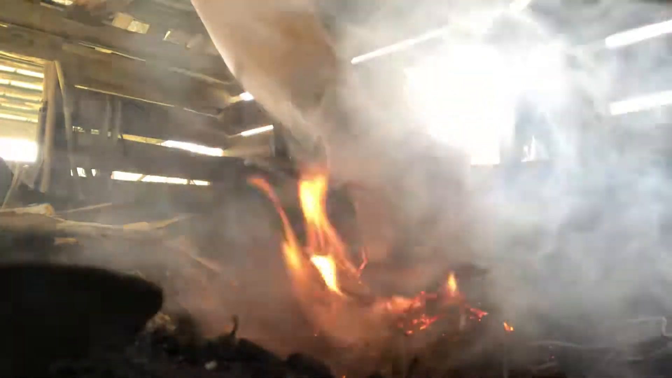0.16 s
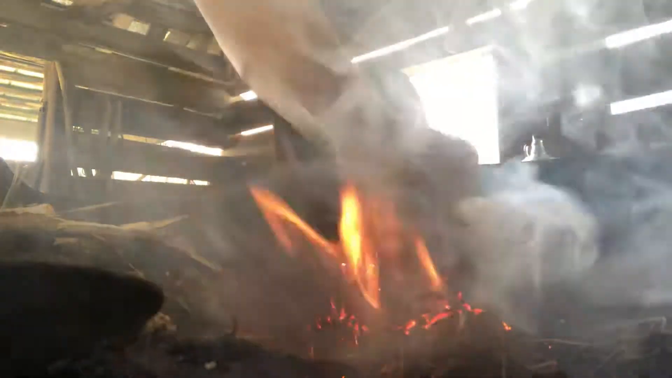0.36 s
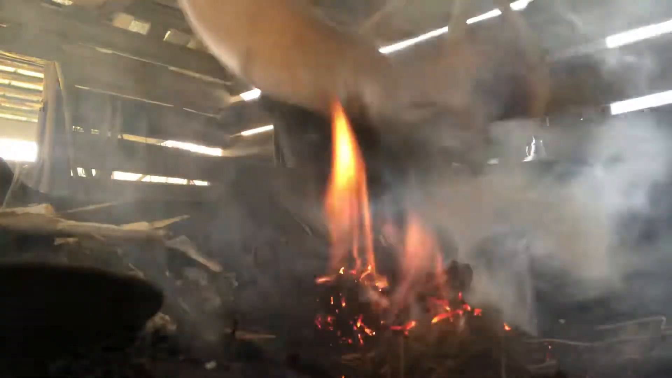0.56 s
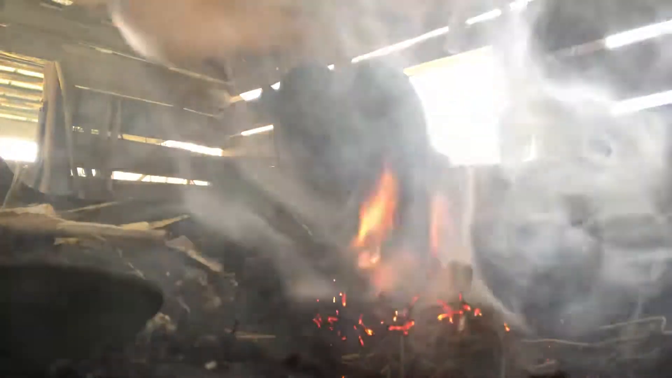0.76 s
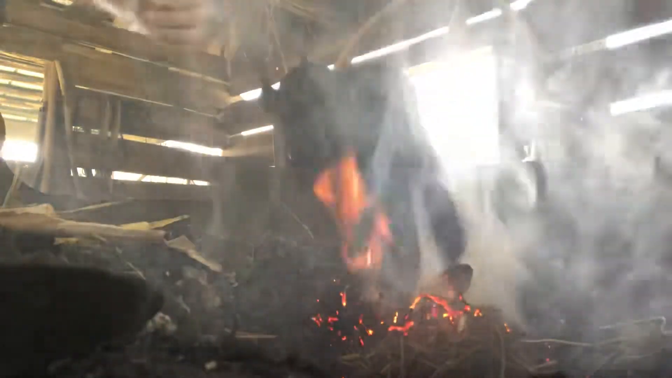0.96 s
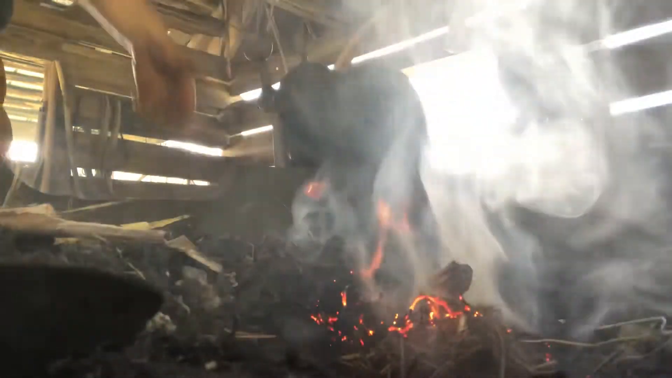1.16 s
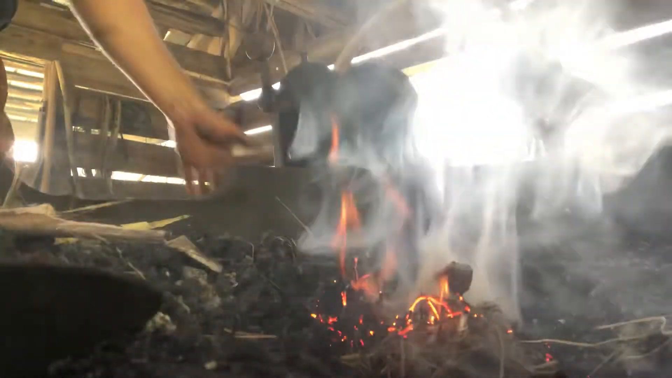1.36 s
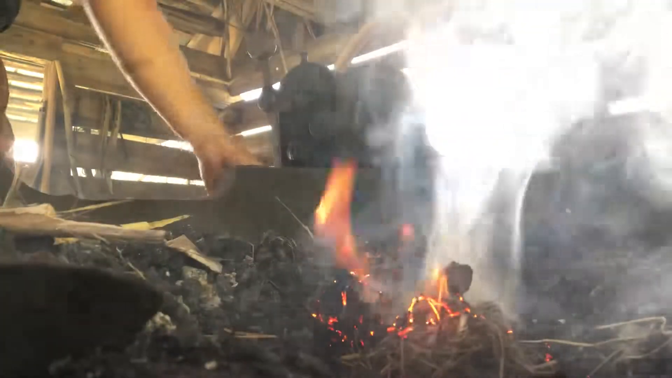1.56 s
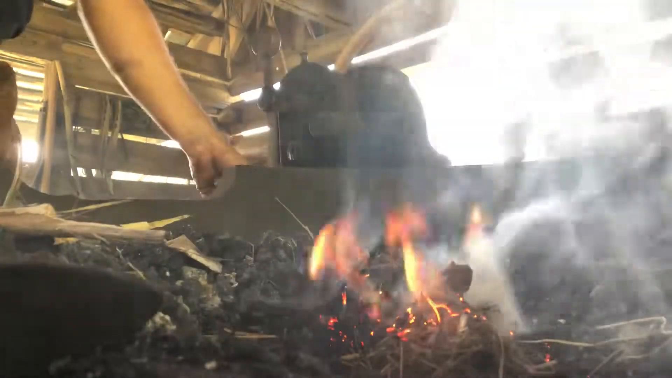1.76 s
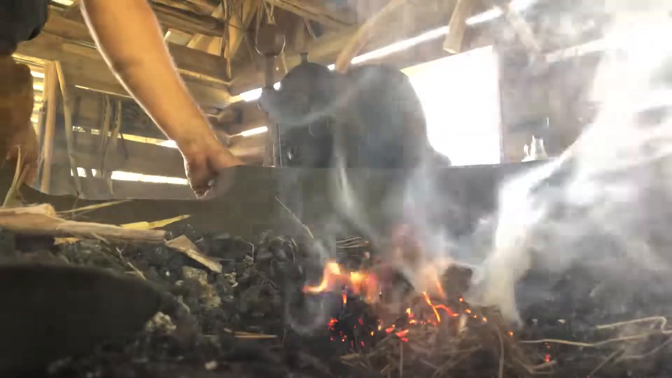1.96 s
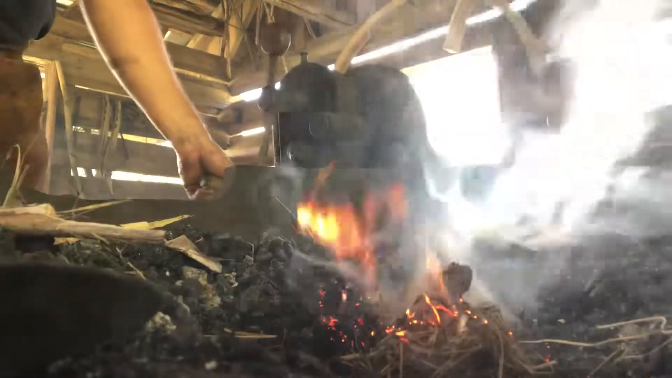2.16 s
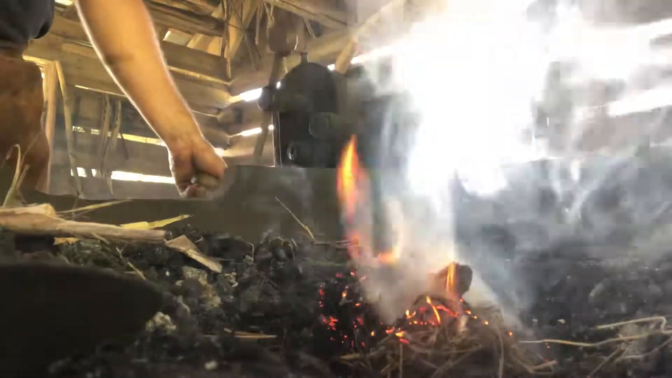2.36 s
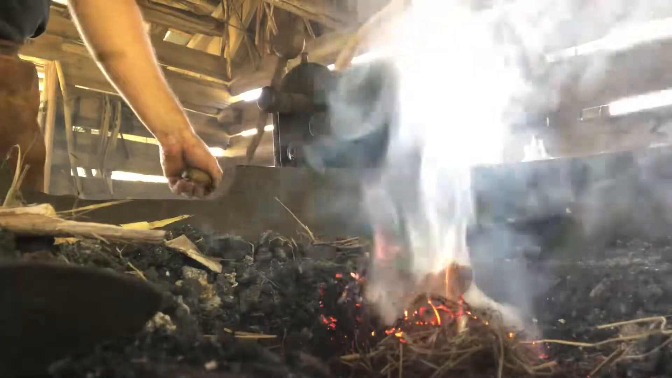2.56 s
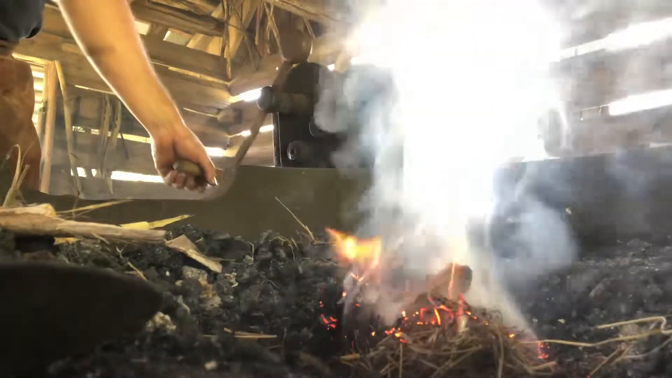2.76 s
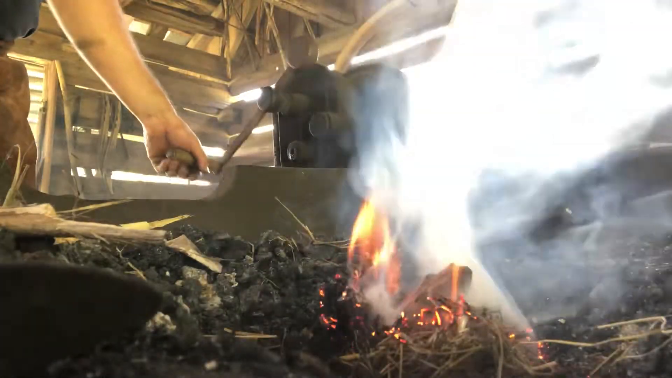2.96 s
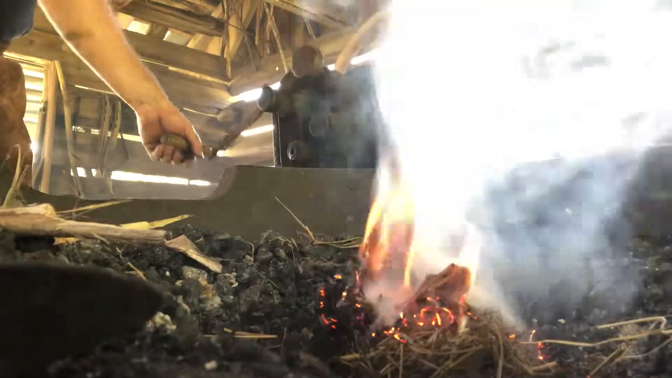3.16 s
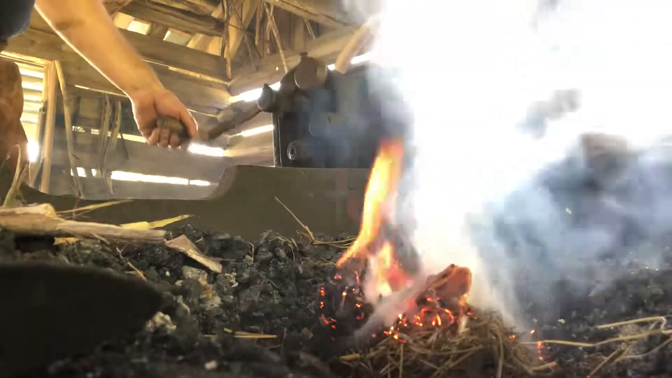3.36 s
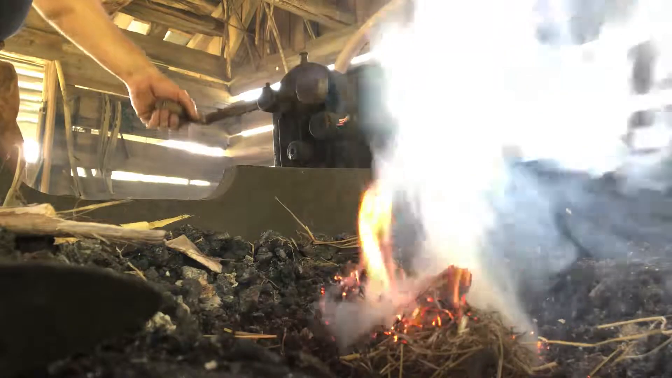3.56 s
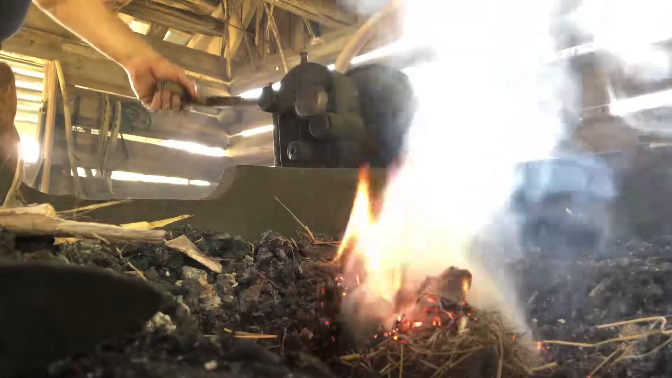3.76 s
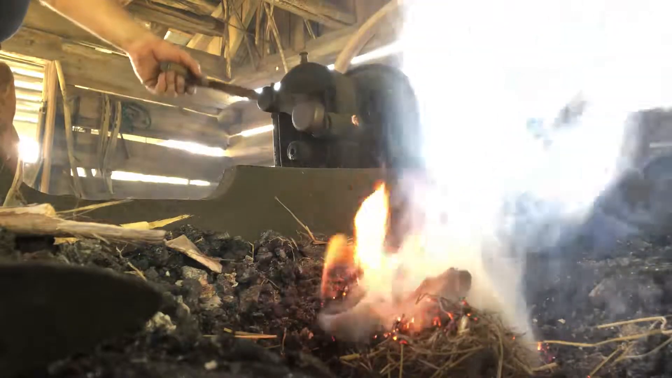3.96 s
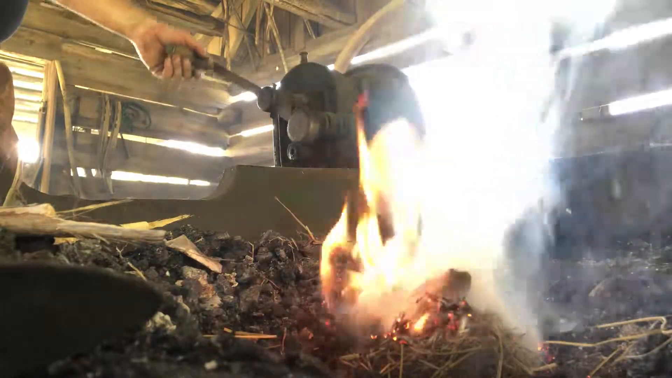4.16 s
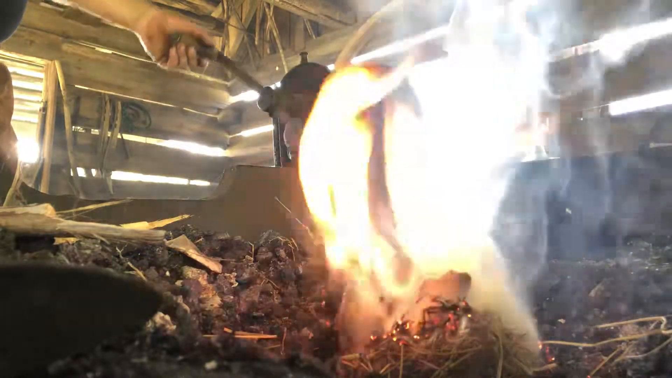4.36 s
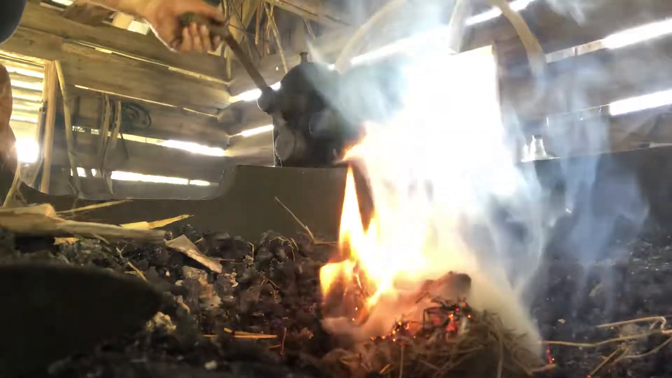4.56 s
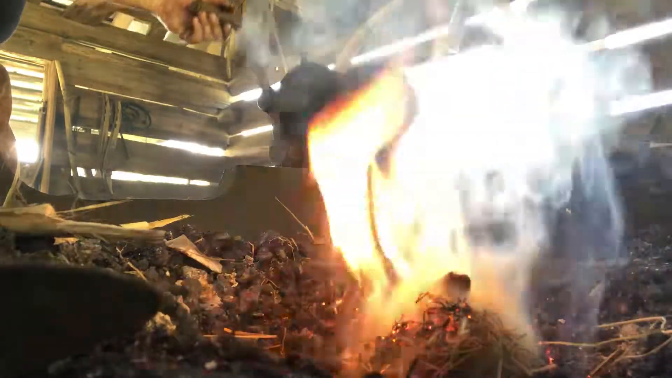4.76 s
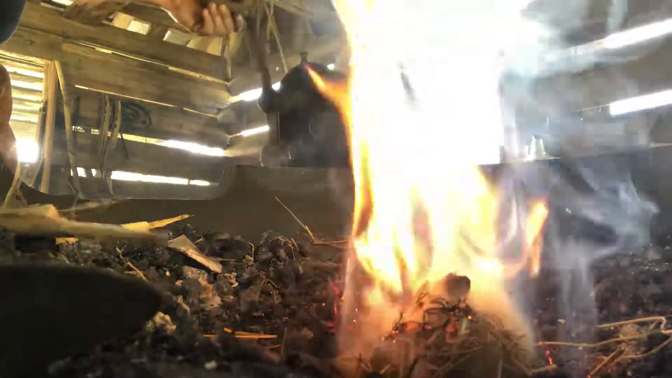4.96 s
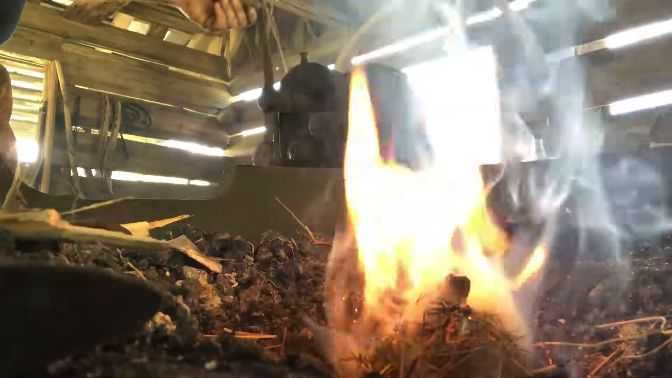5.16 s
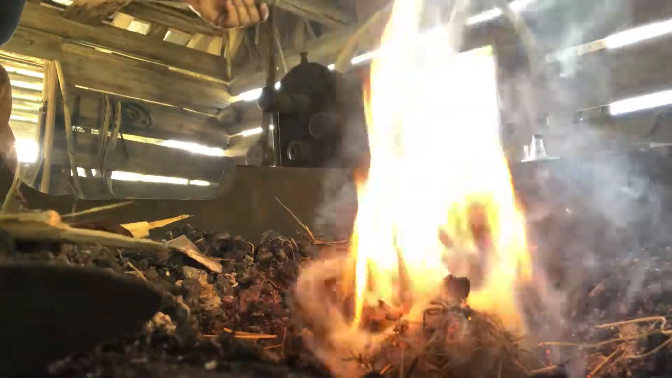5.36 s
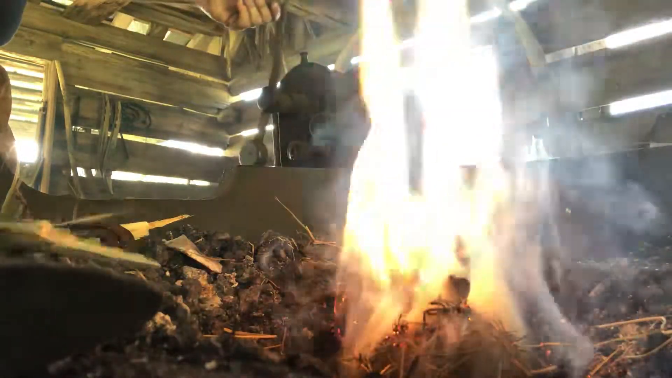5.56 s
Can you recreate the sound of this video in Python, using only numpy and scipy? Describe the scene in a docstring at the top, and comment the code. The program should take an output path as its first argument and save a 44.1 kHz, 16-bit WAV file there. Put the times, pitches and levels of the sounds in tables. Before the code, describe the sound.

From the edge of a hearth in a slatted shed, a geared hand blower is heard close up over faint hiss and soft low air flutter. For the first second and a half the fan coasts with a low drone and airy whirr, its gear noise fading. At about 1.6 seconds the loose grip clicks and the blower shudders; around 1.7 a tight cluster of heavy iron knocks rings briefly with clatter. The crank arm clanks at 2.0, followed by a short gear groan. Cranking then builds into a steady, uneven whir by about 2.8, with throbbing drone, wavering whines and a raspy, singing edge of metal teeth. Soft gusts come near 4 seconds, and lesser knocks at 4.4 and 4.6. From about 4.7 fine straw crackle grows, with distinct dry snaps from 4.9 until the end at roughly 5.6, the whir still running.

```python
"""Hand-cranked forge blower

A geared blower feeds a small fire of straw and coals in a slatted shed.
The fan coasts with a low drone, a hand grabs the crank, the slack gears knock, the teeth whir.
Noise through resonances makes fan and gears, dying sines and noise the blows, noise bursts the fire.
Late on, the straw crackles ever louder."""
import sys
import numpy as np
from scipy import signal
from scipy.fft import rfft, irfft, next_fast_len
from scipy.io import wavfile
from scipy.ndimage import uniform_filter1d

SR = 44100
rng = np.random.default_rng(int(sys.argv[2]) if len(sys.argv) > 2 else 0)


def inscribe(sig):
    """Save sig as 16-bit PCM at rate SR to the path in sys.argv[1].

    A 1-D sig is mono; a 2-D sig holds one channel per row.
    Samples are clipped to [-1, 1] before scaling.
    """
    pcm = np.round(np.clip(np.atleast_2d(sig).T, -1, 1) * 32767)
    wavfile.write(sys.argv[1], SR, pcm.astype(np.int16))


N = 247489
TIME = np.arange(N) / SR  # s
PADDED = next_fast_len(N)
BINS = np.fft.rfftfreq(PADDED, 1 / SR)  # Hz
CUT_HZ = 15700

# Faint shed hiss, relative spectrum: (frequency [Hz], density [dB per Hz])
HISS_SPECTRUM = [(1470, -48), (2500, -7), (2760, -1.5), (2980, 0), (3100, 1), (4600, 0), (5750, -0.5),
                 (8420, -5.5), (15500, -12)]
# Low flutter of the blast, relative spectrum: (frequency [Hz], density [dB per Hz])
BUFFET_SPECTRUM = [(15, -48), (28, -37), (42, -17.5), (62, -3), (90, -4), (115, -0.5), (160, -4.5),
                   (300, -5.5), (700, -52), (2000, -91)]
# Blast through the coals, relative spectrum: (frequency [Hz], density [dB per Hz])
RUSH_SPECTRUM = [(100, -21.5), (450, 2.5), (900, -1), (1500, -9), (1900, -18), (2400, -11), (5000, -42)]
# Deep flutter of a gust, relative spectrum: (frequency [Hz], density [dB per Hz])
GUST_SPECTRUM = [(15, -42), (28, -14), (46, -6), (70, 0.5), (110, -4.5), (170, 2), (380, -1), (800, -23.5),
                 (2000, -41)]
# Airy whirr of the freewheeling fan, relative spectrum: (frequency [Hz], density [dB per Hz])
COAST_SPECTRUM = [(200, -15), (450, 11), (800, -5), (1150, -6.5), (1600, 2), (2000, -14), (3000, -22)]
# Gusts of air and flame: (time [s], hold [s], level before the lowpass [dB], highest frequency [Hz])
GUSTS = [(1.61, 0.15, -43.5, 900), (1.744, 0.13, -44.5, 900), (1.863, 0.028, -39, 75),
         (3.97, 0.44, -55.5, 900), (4.393, 0.273, -52.5, 700), (5.147, 0.06, -53, 110)]
# Snaps of straw and kindling:
# (time [s], peak [dB], ring frequency [Hz], t60 [s], bright tick relative to ring [dB])
SNAPS = [(4.917, -50.5, 4150, 0.073, 3.5), (4.936, -50, 3800, 0.07, -3), (4.955, -45, 4030, 0.028, -6),
         (4.999, -55.5, 3730, 0.15, -13), (5.075, -53, 3600, 0.13, -18), (5.094, -52, 3720, 0.037, -15),
         (5.136, -63, 4000, 0.028, -16), (5.307, -48.5, 3400, 0.1, -4), (5.355, -49, 3700, 0.1, 0),
         (5.381, -53, 3480, 0.042, -4), (5.573, -54.5, 3720, 0.19, -15), (5.595, -49, 3370, 0.11, -5.5)]

# Fan housing resonances: (frequency [Hz], width [Hz], gain [dB], extra gain per unit of lean [dB])
HOUSING_MODES = [(130.4, 9.6, -3.5, 3), (127, 11, -17, 5.5), (197.5, 14, -16.5, -14), (202.5, 11.3, 0, 1.5),
                 (256.3, 28, 4, -0.5), (311.3, 8.3, 0.5, -3), (333, 17, -15, 10.5), (389, 14, -9, 0.5)]
# Low gear case resonances: (frequency [Hz], width [Hz], gain [dB], extra gain per unit of lean [dB])
CASE_MODES = [(389, 43, -7, -4.5), (449, 15, -5, 3.5), (468, 9.3, 1.5, -3.5), (506, 18.5, 0, 1.5),
              (573, 74, -18, -14), (645, 25, -8.5, -1), (733, 43, -7.5, -0.5), (812, 17, -10, 2),
              (868, 80, -14, 0)]
# High gear wheel resonances: (frequency [Hz], width [Hz], gain [dB], extra gain per unit of lean [dB])
WHEEL_MODES = [(1046, 71, 7, 0), (1164, 31, -2, -2), (1283, 250, 3, 1), (1570, 64, 4, 4),
               (1740, 100, 0, -1), (1943, 22, 3.5, 0), (2044, 85, -3, -1.5), (2407, 42, -4, 0),
               (2560, 18, -5.5, 2.5), (2772, 35, -5.5, 0.5), (3210, 36, -16, 6)]
# Struck blower: (frequency [Hz], level [dB], t60 before the ring factor [s])
IRON_MODES = [(105, -21, 0.13), (128.7, 0.5, 0.7), (214.2, -3, 0.59), (276, -11.5, 0.18),
              (331.4, 11.5, 0.048), (443.6, 13.5, 0.041), (478, 10.5, 0.058), (538, -11.5, 0.32),
              (620, -12, 0.12), (791, 2, 0.06), (1055, -8.5, 0.029), (1260, -15, 0.024), (1496, -29, 0.047),
              (1605, -10, 0.062), (1700, -16, 0.048), (1744, -11, 0.051), (1894, -9, 0.076),
              (2060, -12.5, 0.072), (2162, -23, 0.1), (2285, -20.5, 0.1), (2640, -29, 0.12),
              (2770, -32, 0.055), (2880, -54, 0.12), (3370, -23, 0.05), (4050, -15, 0.04),
              (4700, -29, 0.04)]
# Struck crank arm: (frequency [Hz], level [dB], t60 [s])
CRANK_MODES = [(265.7, -8.5, 0.21), (340, -5.5, 0.065), (438, 0, 0.06), (540, 0.5, 0.1), (600, -6, 0.075),
               (790, -10, 0.18), (1060, -25, 0.088), (1740, -17.5, 0.04), (1914, -18, 0.1),
               (2280, -32, 0.078), (2565, -37, 0.15), (2670, -34, 0.1), (3240, -39, 0.067),
               (3600, -32, 0.032), (4070, -40, 0.035)]
# Struck grip: (frequency [Hz], level [dB], t60 [s])
GRIP_MODES = [(1590, 2, 0.1), (1840, 4, 0.09), (2190, 8, 0.075), (2270, 4, 0.069), (2520, 8, 0.09),
              (2630, 5, 0.09), (2750, 3, 0.12), (2950, -9, 0.08), (4520, 0, 0.03), (5050, 13.5, 0.02),
              (5240, 1, 0.06), (5340, -4, 0.07)]

# Gear effort, as whir level; fan and whine follow it: (time [s], level [dB])
WHIR_CURVE = [(0.0, -59.5), (1.31, -68.5), (1.64, -72), (1.78, -55), (2.84, -48.5), (4.28, -49),
              (4.58, -46.5), (4.72, -50), (5.61, -49)]
# Rasp of the teeth, builds as the wheels take the load: (time [s], level before the rasp gain [dB])
RASP_CURVE = [(0.0, -77), (0.58, -76), (1.12, -80.5), (1.58, -80.5), (1.78, -74.5), (1.97, -74),
              (2.62, -65), (2.78, -66), (3.28, -64.5), (5.61, -64.5)]
# Arm weight on the crank, shifts load between the wheels:
# (time [s], lean [1 = pressing down, -1 = lifting over the top])
LEAN_CURVE = [(0, 1.28), (1.5, -1.32), (1.8, 2.5), (2.2, 0.94), (2.7, 0.5), (3.3, 0.87), (3.8, .5),
              (4.2, -0.56), (4.6, 0.04), (5.0, -1.5), (5.61, -0.7)]
# Swells and dips of the fan drone: (time [s], gain [dB])
DRONE_SURGES = [(.08, 14), (.17, 12.5), (.88, 17.5), (1.10, 15.5), (1.35, 16.5), (2.17, 11), (2.30, -25),
                (2.42, -4), (2.67, 11), (2.79, 10), (3.58, 17), (3.87, 14), (4.01, 7), (4.25, 14.5),
                (4.39, 7.5), (4.50, 14), (4.66, 5), (4.80, 13), (4.96, -8), (5.07, 16.5)]
# Swells and dips of the lower gear whine: (time [s], gain [dB])
WHINE_SURGES = [(2.06, 13.5), (2.23, 12), (3.42, 11), (3.69, 13.5), (3.87, 4), (3.94, 6), (4.01, 7.5),
                (4.06, 8.5), (4.17, 13), (4.28, -22), (4.57, 5), (4.72, 11), (4.98, 13), (5.13, 4.5),
                (5.30, 11), (5.43, 12.5)]
# Swells of the upper gear whine: (time [s], gain [dB])
UPPER_WHINE_SWELLS = [(1.70, 20), (2.035, 13), (2.125, 11), (2.175, 14), (2.53, 8), (2.71, 8), (3.02, 9),
                      (3.35, 8), (3.45, 11), (3.53, 11), (3.74, 10), (3.82, 10), (4.20, 10), (4.43, 12),
                      (4.61, 9), (5.43, 14)]
# Loaded wheels that sing: (time [s], hold [s], level [dB], pitch [Hz], width [Hz])
SINGING_WHEELS = [(2.60, 1.0, -71, 1573, 38), (4.55, 0.6, -74.5, 1912, 70)]

# Clicks of the loose grip: (time [s], peak [dB], highest frequency excited [Hz])
GRIP_CLICKS = [(1.581, -52, 3000), (1.595, -39.5, 10000), (1.620, -56, 3500)]
# Knocks of the slack gears, and two brief bumps in the whir (3.912, 4.287):
# (time [s], level [dB], lowest frequency excited [Hz], highest frequency excited [Hz],
# ring [factor on t60], clatter [relative dB], bright crack [relative dB])
KNOCKS_AND_BUMPS = [(1.654, -41, 500, 1480, 0.61, -18, -37), (1.692, -46.5, 650, 1900, 1.4, -3, -40),
                    (1.719, -26, 300, 2590, 0.85, -3, -22.5), (1.7225, -18.5, 234, 2430, 0.87, -5.5, -30.5),
                    (1.7305, -16.5, 137, 1530, 0.73, -13.5, -35), (1.7345, -33, 1200, 2200, 0.9, -14, -37),
                    (1.7505, -20.5, 128, 590, 0.45, 4, -47), (1.7515, -42, 1400, 2100, 0.6, -12, -32),
                    (1.771, -23.5, 69, 590, 0.17, -3, -61), (1.783, -60, 1500, 2600, 0.55, -14, -31),
                    (1.805, -59, 1800, 2900, 0.69, -8, -28), (1.820, -39.5, 500, 1070, 2.3, -18, -57),
                    (3.912, -47.5, 900, 1720, 1.2, 1, -38), (4.287, -44, 700, 1200, 0.46, 11, -40),
                    (4.403, -34.5, 326.5, 2520, 0.92, -6, -24), (4.420, -34, 342, 810, 0.48, -7, -55),
                    (4.579, -41.5, 810, 2190, 0.79, 5, -50), (4.5895, -28, 270, 2500, 1.1, -4.5, -28),
                    (4.608, -32.5, 260, 890, 0.5, 7, -58)]

FULL_WHIR_DB = -50.5  # whir curve value at which effort is 1
THROB_PER_S, THROB_DB, ENGAGE_S = 7.57, 4.5, 2.01  # one throb per shaft turn, phased to gear engagement
SURGE_S = 0.023  # from the centre of a swell or dip to 1/e, either side
SHUDDER_S, SHUDDER_HOLD_S = 1.605, 0.13  # blower shudders on its stand as the hand takes the crank
CLANK_S, GROAN_S = 1.997, 2.145  # crank arm clanks as the drive takes hold; gears groan just after
GUST_RISE_S, GUST_T60_S = 0.019, 0.34
COAST_S, COAST_HOLD_S = 0.14, 0.45
CATCH_S, CRACKLE_DB, CRACKLE_DB_PER_S = 4.65, -86, 13.5  # crackle grows once the straw catches
RATTLE_PER_S, RATTLE_T60_S = 500, 0.14  # t60 before the ring factor


def amp(db):
    """Decibels to gain."""
    return 10 ** (np.asarray(db) / 20)


def unit(x):
    """Scales to rms 1."""
    return x / np.sqrt(np.mean(x ** 2) + 1e-20)


def curve(rows):
    """Breakpoints to one value per sample."""
    return np.interp(TIME, *np.transpose(rows))


def decay(db, t, t60_s):
    """Gain that starts at db and falls 60 dB in t60_s."""
    return amp(db - 60 * t / t60_s)


def attack(t, rise_s):
    """Exponential onset."""
    return 1 - np.exp(-t / rise_s)


def add(mix, start_s, sound):
    """Mixes a sound in at start_s."""
    part = mix[max(round(start_s * SR), 0):][:len(sound)]
    part += sound[:len(part)]


def band(x, low_hz, high_hz, order=2):
    """Keeps what lies between two edges."""
    for hz, kind in ((low_hz, "highpass"), (high_hz, "lowpass")):
        sos = signal.butter(order, min(hz, SR / 2 - 1), kind, fs=SR, output="sos")
        x = signal.sosfilt(sos, x)
    return x


def filtered_noise(gain):
    """White noise through a gain per frequency bin, at rms 1."""
    return unit(irfft(rfft(rng.standard_normal(PADDED)) * gain, PADDED)[:N])


def wander(rate_hz):
    """Slow random drift of rms 1."""
    return filtered_noise(np.exp(-(BINS / rate_hz) ** 2))


def coloured(points):
    """Noise with the given spectrum, rms 1."""
    hz, db = np.transpose(points)
    return filtered_noise(amp(np.interp(np.log(BINS + 1), np.log(hz), db)))


def band_surges(depth_db):
    """Random rises and dips in dB, several a second, limited to depth_db."""
    return depth_db * np.tanh(1.5 * wander(11))


def timed_surges(rows, between_db):
    """Gain that follows between_db, except where a short rounded swell or dip takes over."""
    times, db = np.transpose(rows)[:, :, None]
    shapes = np.exp(-((TIME - times) / SURGE_S) ** 2)
    return amp((db * shapes).sum(0) + (1 - shapes.sum(0)) * between_db)


def burst(start_s, rise_s, hold_s, t60_s):
    """Attack, hold and release, as a gain per sample."""
    rise = np.clip((TIME - start_s) / rise_s, 0, 1)
    return rise * decay(0, np.maximum(TIME - start_s - rise_s - hold_s, 0), t60_s)


def effort(power):
    """Gain that follows the cranking; the lower the power, the less it falls with effort."""
    return (amp(curve(WHIR_CURVE)) / amp(FULL_WHIR_DB)) ** power


def steadied(x, share, size=3500):
    """Evens out a share of the slow level swings; size in samples."""
    power = uniform_filter1d(uniform_filter1d(x ** 2, size), size // 2)
    power = abs(power) + 1e-9
    return unit(x / power ** (np.clip(share, 0, 1) / 2))


def body(x, modes, skirt):
    """Resonances that swell or fade with the lean on the crank; skirt sets how fast they fall off."""
    spectrum = rfft(x, PADDED)
    pressed = np.clip((1 + curve(LEAN_CURVE)) / 2, 0, 1)
    hz, width_hz, db, lean_db = np.transpose(modes)[:, :, None]
    shapes = (1 + (2 * (BINS - hz) / width_hz) ** 2) ** -skirt

    def leaning(lean):
        power = (amp(db + lean * lean_db) ** 2 * shapes).sum(0)
        return irfft(spectrum * np.sqrt(power), PADDED)[:N]

    return unit(pressed * leaning(1) + (1 - pressed) * leaning(-1))


def tone(hz, width_hz, lean_hz, floor):
    """Sharp resonance kept ringing: pitch wavers by chance and shifts by lean_hz per unit of lean."""
    sos = signal.butter(2, width_hz / 2, fs=SR, output="sos")
    drift = signal.sosfilt(sos, rng.standard_normal((2, N + SR)))[:, SR:]
    swing = unit(drift[0]) + 1j * unit(drift[1])
    swing /= np.sqrt(abs(swing) ** 2 + floor ** 2)  # steady drive: the lower the floor, the more even
    turns = np.cumsum(hz + lean_hz * curve(LEAN_CURVE)) / SR
    return unit((swing * np.exp(2j * np.pi * turns)).real)


def ringing(modes, t, ring=1):
    """Dying sines of a struck object."""
    return sum((-1) ** k * decay(db, t, t60_s * ring) * np.sin(2 * np.pi * hz * t)
               for k, (hz, db, t60_s) in enumerate(modes))


def hiss(db=-76):
    """Faint hiss of the shed, a little lower while the blower runs hard."""
    return amp(db) * effort(power=-0.043) * coloured(HISS_SPECTRUM)


def draught(buffet_db=-60.5, rush_db=-68):
    """The blast flutters at low pitch, deeper in gusts, and rushes softly through the coals."""
    gusts = np.zeros(N)
    for start_s, hold_s, db, top_hz in GUSTS:
        air = band(coloured(GUST_SPECTRUM), 23, top_hz, order=3)
        gusts += amp(db) * burst(start_s, GUST_RISE_S, hold_s, GUST_T60_S) * air
    buffet = amp(buffet_db) * steadied(coloured(BUFFET_SPECTRUM), share=0.28)
    rush = amp(rush_db) * coloured(RUSH_SPECTRUM)
    return buffet + gusts + rush


def crackle(pops_per_s=110, spread_db=2.5):
    """Many tiny noise bursts, clustered by a random level, growing once the straw catches."""
    pop_db = spread_db * np.minimum(rng.exponential(1, N), 3)
    pops = (rng.random(N) < pops_per_s / SR) * amp(pop_db)
    bursts = signal.oaconvolve(pops, decay(0, TIME[:SR // 10], 0.03))[:N]
    bursts *= amp(2.5 * wander(20))
    growth = amp(CRACKLE_DB + CRACKLE_DB_PER_S * np.maximum(TIME - CATCH_S, 0))
    return growth * unit(band(bursts * rng.standard_normal(N), 1800, 5300, order=6))


def snap(db, hz, t60_s, tick_db, tick_t60_s=0.018):
    """A stalk splits within a millisecond or two: a bright spit and a brief woody ring of noise."""
    t = TIME[:SR // 4]
    tick, ring = rng.standard_normal((2, len(t)))
    ring *= 1 + 3 * (rng.random(len(t)) < 900 / SR) * abs(ring)  # sparse spikes, 900 per s
    ring = band(band(ring, hz / 2, SR / 2), 500, hz * 1.15, order=7)
    sound = unit(ring) * decay(0, t, t60_s)
    sound += unit(band(tick, 1800, 13000, order=1)) * decay(tick_db, t, tick_t60_s)
    sound *= attack(t, rise_s=0.0015)
    return amp(db) * sound / abs(sound).max()


def coasting(db=-68):
    """Air whirrs through the freewheeling fan and dies away as it slows."""
    envelope = burst(COAST_S, rise_s=0.12, hold_s=COAST_HOLD_S, t60_s=2.1)
    return amp(db) * coloured(COAST_SPECTRUM) * envelope * amp(band_surges(depth_db=-0.5))


def fan(rumble_db=-47, drone_db=-53.5, shudder_db=-48, shudder_drone_db=-42):
    """Blade turbulence rumbles in the housing and keeps a resonance droning."""
    rumble = steadied(band(body(rng.standard_normal(N), HOUSING_MODES, skirt=1.45), 74, 1900), share=0.074)
    drone = tone(hz=254.1, width_hz=18.9, lean_hz=-1.892, floor=0.85)
    throb_db = THROB_DB * np.cos(2 * np.pi * THROB_PER_S * (TIME - ENGAGE_S)) + band_surges(depth_db=2.0)
    shudder = burst(SHUDDER_S, rise_s=0.014, hold_s=SHUDDER_HOLD_S, t60_s=0.29)
    rumble_gain = amp(rumble_db) * effort(power=0.26) + amp(shudder_db) * shudder
    drone_gain = amp(drone_db) * effort(power=0.47) * timed_surges(DRONE_SURGES, throb_db)
    drone_gain += amp(shudder_drone_db) * shudder
    return rumble * rumble_gain + drone * drone_gain


def grip_click(db, high_hz, tick_db=12, tick_t60_s=0.0068, scrape_db=8, scrape_t60_s=0.14):
    """The loose grip ticks, rings and rattles on its pin."""
    t = TIME[:SR // 4]
    tick, scrape = rng.standard_normal((2, len(t)))
    scrape = unit(band(band(scrape, 2200, 2900), 900, 2900, order=9))
    sound = ringing(GRIP_MODES, t)
    sound += scrape * decay(scrape_db, t, scrape_t60_s)
    sound += tick * decay(tick_db, t, tick_t60_s)
    sound = band(sound, 890, high_hz)
    return amp(db) * sound / abs(sound).max()


def crank_clank(db=-23.0, build_cycles=4, tick_db=-31, tick_t60_s=0.017, clatter_db=-15, clatter_t60_s=0.16,
                loose_rise_s=0.01, jangle_db=-25, jangle_t60_s=0.08):
    """The arm snaps home on its shaft: tick, ring with slow-building low modes, grip jangle, case clatter."""
    t = TIME[:SR // 2]
    tick, clatter, jangle = rng.standard_normal((3, len(t)))
    ring = sum(ringing([mode], t) * attack(t, build_cycles / mode[0]) for mode in CRANK_MODES)
    tick = unit(band(tick, 3200, 4200, order=7)) * decay(tick_db, t, tick_t60_s) * attack(t, rise_s=0.001)
    jangle = unit(band(jangle, 1000, 3200, order=6)) * decay(jangle_db, t, jangle_t60_s)
    clatter = unit(band(clatter, 270, 430)) * decay(clatter_db, t, clatter_t60_s)
    return amp(db) * (ring + tick + (clatter + jangle) * attack(t, loose_rise_s))


def knock_or_bump(db, low_hz, high_hz, ring, clatter_db, crack_db, clatter_t60_s=0.13, rise_s=0.00092,
                  crack_t60_s=0.036, rattle_db=-20):
    """Iron modes crack and ring, with a noise clatter and a sparse rattle of the teeth."""
    t = TIME[:SR // 2]
    loose, crack, teeth_hit = rng.standard_normal((3, len(t)))
    onset = attack(t, rise_s)
    clatter = unit(band(loose, 160, 630, order=1)) * decay(clatter_db, t, clatter_t60_s * ring)
    taps = teeth_hit * (rng.random(len(t)) < RATTLE_PER_S / SR)
    rattle = unit(band(taps, 1600, 4100, order=3)) * decay(rattle_db, t, RATTLE_T60_S * ring)
    sound = band((ringing(IRON_MODES, t, ring) + clatter + rattle) * onset, low_hz, SR / 2)
    sound = band(sound, 36, high_hz, order=5)  # a softer contact leaves the high modes still
    crack = band(crack, 1500, 3300, order=1) * onset * decay(crack_db, t, crack_t60_s)
    return amp(db) * (sound / abs(sound).max() + crack)


def singing(start_s, hold_s, db, hz, width_hz):
    """A loaded wheel sings with a rough, wavering tone, then fades as the load moves on."""
    flutter = amp(band_surges(1.5) + 2.5 * wander(45))
    voice = unit(flutter * tone(hz, width_hz, lean_hz=0, floor=1.5))
    return amp(db) * voice * burst(start_s, rise_s=0.05, hold_s=hold_s, t60_s=2.5)


def teeth(contacts_per_s, spread_db, slide, lope_db):
    """Loose teeth tap unevenly and slide between taps; the worn shafts make the load lope."""
    tap_gain = amp(spread_db * rng.standard_normal(N))
    taps = (rng.random(N) < contacts_per_s / SR) * rng.choice([-1, 1], N) * tap_gain
    return (unit(taps) + slide * rng.standard_normal(N)) * amp(lope_db * wander(17))


def gears(whir_db=-52, whine_db=-55.5, upper_whine_db=-62, rasp_db=2, shudder_db=-52, scrape_db=-18,
          groan_db=-45):
    """The same tooth contacts ring the case low and the wheels high; two case modes whine in surges."""
    contacts = teeth(contacts_per_s=600, spread_db=-1.5, slide=0.86, lope_db=2.0)
    whir = steadied(band(body(contacts, CASE_MODES, skirt=1.27), 180, 1450, order=4), share=0.49)
    rasp = steadied(band(body(contacts, WHEEL_MODES, skirt=1.12), 1010, 6000), share=0.43)
    rasp *= amp(1.6 * wander(35))

    lower = tone(hz=535.0, width_hz=23.6, lean_hz=-3.5, floor=0.86)
    lower *= timed_surges(WHINE_SURGES, band_surges(depth_db=6.5))
    upper = tone(hz=805, width_hz=46.4, lean_hz=-3.5, floor=1.0)
    upper *= timed_surges(UPPER_WHINE_SWELLS, band_surges(depth_db=2.5))
    whine = amp(whine_db) * lower + amp(upper_whine_db) * upper

    shudder = amp(shudder_db) * burst(SHUDDER_S, rise_s=0.0044, hold_s=SHUDDER_HOLD_S, t60_s=0.27)
    groan = amp(groan_db) * tone(hz=763.4, width_hz=65, lean_hz=0, floor=0.97)
    groan *= burst(GROAN_S, rise_s=0.0079, hold_s=0.017, t60_s=0.073)

    case = (amp(whir_db) * effort(power=1.03) + shudder) * whir + effort(power=1.06) * whine + groan
    wheels = (amp(scrape_db) * shudder + amp(rasp_db) * amp(curve(RASP_CURVE))) * rasp
    return case + wheels


def scene():
    """Shed, fire and blower, heard from the edge of the hearth."""
    mix = hiss() + draught() + crackle() + coasting() + fan() + gears()
    mix += sum(singing(*row) for row in SINGING_WHEELS)
    for table, source in ((SNAPS, snap), (GRIP_CLICKS, grip_click), (KNOCKS_AND_BUMPS, knock_or_bump)):
        for start_s, *settings in table:
            add(mix, start_s, source(*settings))
    add(mix, CLANK_S, crank_clank())
    return mix[None]


def record(dry):
    """Steep lowpass at CUT_HZ."""
    lowpass = signal.firwin(511, CUT_HZ, window=("kaiser", 9), fs=SR)
    return signal.oaconvolve(dry, lowpass[None], "same")


dry = scene()
out = record(dry)
inscribe(out)
```